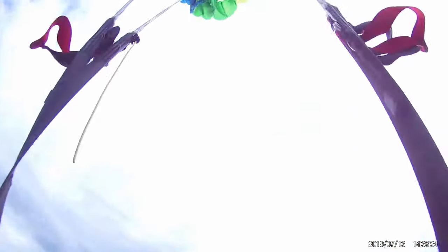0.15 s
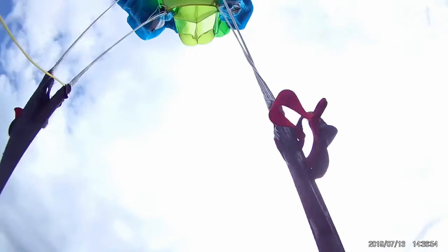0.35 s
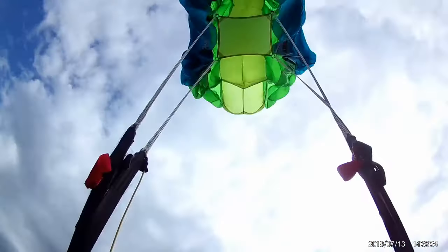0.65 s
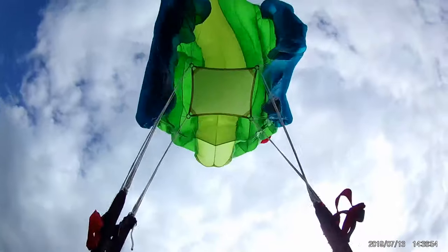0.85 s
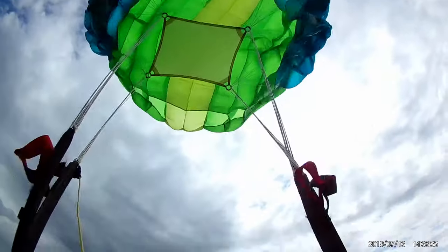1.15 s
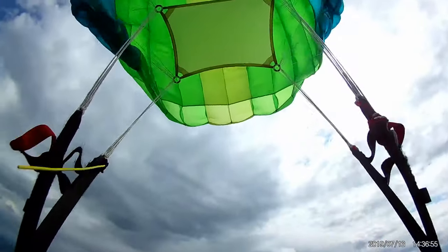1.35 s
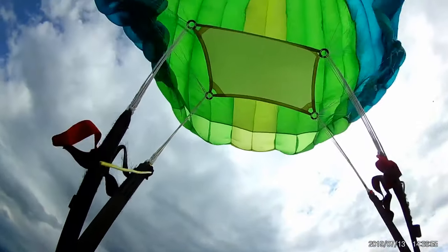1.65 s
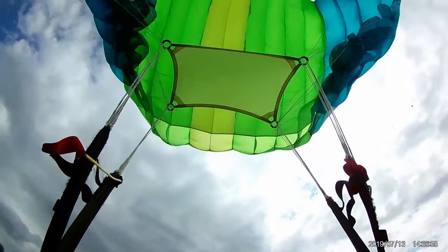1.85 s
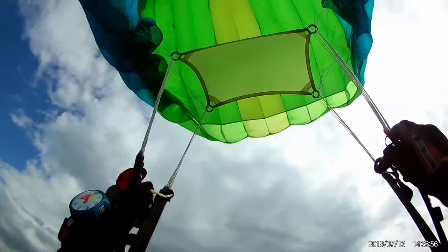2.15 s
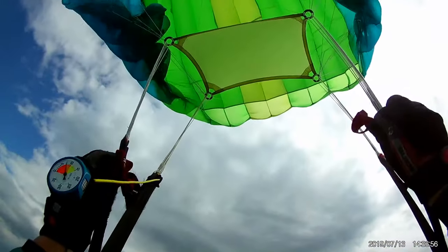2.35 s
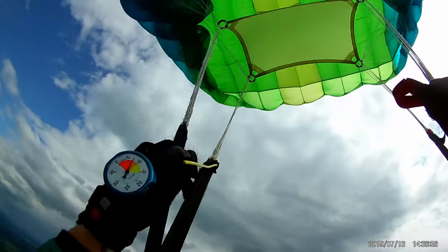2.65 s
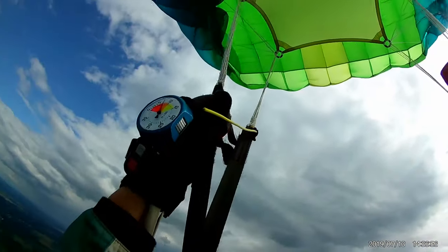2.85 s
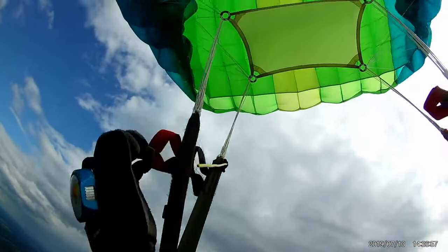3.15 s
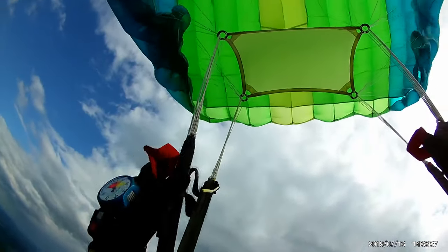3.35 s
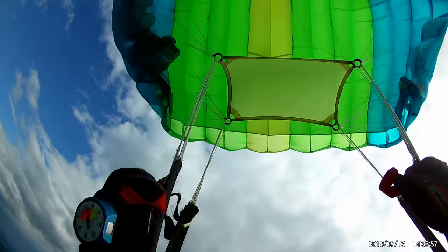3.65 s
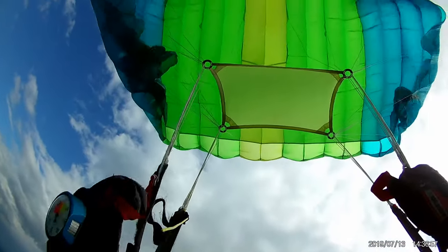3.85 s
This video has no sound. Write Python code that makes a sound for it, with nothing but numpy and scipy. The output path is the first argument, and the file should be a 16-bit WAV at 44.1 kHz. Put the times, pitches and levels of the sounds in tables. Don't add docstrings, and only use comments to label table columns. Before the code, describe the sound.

Wind roars at overload for a fraction of a second with cloth snaps and buckle ticks, then falls sharply as a parachute opens, leaving quiet low buffeting and hiss high in open air, on a helmet-mounted microphone.

```python
import sys
import numpy as np
from scipy import signal
from scipy.fft import rfft, irfft, next_fast_len
from scipy.io import wavfile
from scipy.ndimage import uniform_filter1d, map_coordinates

SR = 44100
rng = np.random.default_rng(int(sys.argv[2]) if len(sys.argv) > 2 else 0)


def digitize_waveform(pressure):
    field = np.atleast_2d(pressure).T
    bounded = np.clip(field, -1, 1)
    quanta = np.round(bounded * 32767).astype(np.int16)
    wavfile.write(sys.argv[1], SR, quanta)


def gain_from_db(level_db):
    decades = np.asarray(level_db, float) / 20
    return 10 ** decades


N = 176400

# time_s, air_db, buffet_db, roar_db
AIRSTREAM = [(0, -18, 6, 0.5), (.09, -21, 0.5, 5), (0.149, -22, 9.5, 4), (.24, -35, 18.5, 3),
             (0.361, -40, 22, 5.5), (0.601, -36, 14.5, 2), (.76, -40, 13.5, 3), (.95, -41.5, 12, 2.5),
             (1.15, -38.5, 9.5, -2.5), (1.251, -42, 1.5, -2.5), (1.3, -41.5, 9.5, 3), (1.6, -40.5, 11, 1.5),
             (2.05, -44, 10, 1), (2.25, -48.5, 12.5, 3), (2.48, -42.5, 6.5, -1), (2.75, -46, 8, 1.5),
             (3.05, -43, 5, 1), (3.95, -49.5, 14, 1.5)]
# frequency_hz, density_db
RUMBLE_SPECTRUM = [(12, -56), (20, -2.5), (38, -18.5), (56, -6), (75, -3), (140, -15), (220, -23.5),
                   (290, -41.5), (480, -120)]
# frequency_hz, density_db
SLACK_ROAR_SPECTRUM = [(76, -33.5), (130, -2.5), (260, -10.5), (365, -3), (415, -8.5), (781, -20),
                       (1000, -21), (1300, -50.5), (2200, -120)]
# frequency_hz, density_db
TAUT_ROAR_SPECTRUM = [(76, -27), (130, -2), (221, -4.5), (509, -1), (584, -10), (653, -4.5), (1000, -18.5),
                      (1300, -50.5), (2200, -120)]
# frequency_hz, density_db
HISS_SPECTRUM = [(700, -13.5), (1000, -9.5), (1600, -7.5), (2250, -15.5), (2650, -28), (4750, -32),
                 (7400, -34.5), (7900, -48)]
# centre_hz, width_hz, boost_db
HOUSING_CAVITIES = [(1278, 276, 9), (1920, 490, 7), (2160, 88, 1), (3045, 820, 16.5), (4000, 960, 11.5),
                    (5810, 1140, 9)]
# centre_hz, width_hz, level_db
LINE_TONES = [(648, 40, -8.5), (1439, 16, -13), (1894, 44, -16.5), (2122, 29, -18.5), (3620, 60, -33),
              (6000, 440, -31), (3085, 350, -24.5)]
# centre_hz, width_hz, slack_db, taut_db
WHISTLE_TONES = [(1304.4, 70, -0.5, -1), (1922, 45, -8.5, -6.5), (2300, 110, -9.5, -15)]
# time_s, level_db
PORT_EXPOSURE = [(0, -29), (.1, -29), (.24, -40), (.35, -43), (.65, -40), (.78, -47.5), (.9, -43),
                 (1.03, -51), (1.08, -42), (1.33, -42.5), (1.4, -52.5), (1.6, -49), (1.68, -57.5),
                 (1.9, -54.5), (4, -58.5)]
# peak_s, peak_db, length_s, dullness_db
CLOTH_SNAPS = [(.01, -6, 0.0072, 3.5), (0.047, -14, 0.011, 4.5), (0.088, -5.5, 0.0053, -1),
               (0.107, -13.5, 0.0094, 6), (0.117, -19, 0.0065, 1), (0.173, -18, 0.0028, 15.5),
               (.001, -17, 0.0023, 5), (0.144, -14, 0.013, 5.5), (0.206, -18, 0.015, 5.5),
               (0.27, -22, 0.01, 8), (0.324, -30.5, 0.013, 9), (0.349, -29, 0.0083, 6.5),
               (.38, -25, 0.01, 5), (.475, -30, 0.016, 13.5), (0.57, -43.5, 0.0085, 0),
               (0.632, -25, 0.012, 6.5), (0.693, -27, .012, 7.5), (1.112, -32, 0.0036, -1),
               (1.249, -46, 0.0027, -9), (1.277, -25.5, 0.0059, -11), (1.327, -33.5, 0.016, -2),
               (1.791, -35.5, 0.0046, -5), (1.806, -38, .006, -8), (1.863, -40, 0.015, -14)]
# frequency_hz, density_db
CRISP_SPECTRUM = [(120, -0.5), (300, -9.5), (700, -9), (1300, -3.5), (2200, -11.5), (2700, -19.5),
                  (4500, -26.5), (7800, -40.5)]
# frequency_hz, density_db
DULL_SPECTRUM = [(90, -13), (200, -0.5), (380, 1), (700, -9.5), (1100, -41)]
# peak_s, peak_db, pitch_hz, half_length_s
EDDY_STRIKES = [(.008, -4, 67, 0.018), (0.167, -6, 60.5, 0.012), (0.211, -12, 65, 0.016),
                (0.263, -12.5, 57.6, 0.012), (0.288, -17, 70, 0.021), (0.342, -14, 54.2, 0.017),
                (0.387, -6, 80, 0.0051), (0.423, -22, 85, 0.019), (0.487, -12.5, 110, 0.011),
                (0.532, -16.5, 64.4, 0.024), (0.601, -23, 60, 0.0077), (0.661, -12.5, 63.7, 0.028),
                (0.82, -24, 71, 0.026), (0.899, -16, 65.5, 0.023), (1.066, -23, 80, 0.013),
                (1.29, -17.5, 67, 0.013), (1.349, -20.5, 69, 0.0093), (1.461, -29, 70.6, 0.016),
                (1.521, -20.5, 71, 0.016), (1.601, -24, 66, 0.014), (1.692, -25.5, 69.6, 0.015),
                (1.765, -27, 57.6, 0.017), (1.958, -28.5, 79.4, 0.024), (2.045, -26.5, 67, 0.017),
                (2.312, -27, 67.3, 0.0055), (2.535, -27, 79, 0.016), (2.665, -28.5, 72.6, 0.032),
                (3.26, -32.5, 74.6, 0.026), (3.812, -30.5, 71.5, 0.021), (3.964, -24.5, 72.4, 0.023)]
# start_s, peak_db, pitch_hz, t60_s
BUCKLE_TICKS = [(.030, -8, 1500, 0.015), (0.052, -15, 1840, .03), (.069, -14, 1380, 0.027),
                (.083, -9, 1276, 0.067), (0.142, -19, 1294, .05), (.208, -17.5, 1316, 0.055),
                (0.256, -25.5, 1400, 0.053), (.483, -32, 1000, 0.043), (1.075, -45, 3830, .12),
                (1.117, -28.5, 1920, 0.045), (1.083, -38, 1290, .05), (1.24, -32, 2050, .04),
                (1.23, -42, 3020, .05), (1.164, -34, 1360, 0.062), (1.159, -39.5, 3020, .05),
                (1.248, -38, 4200, .02), (1.277, -39, 1260, 0.075), (1.334, -39, 3120, .04),
                (1.472, -40, 1740, .03), (.632, -30, 1756, .05), (.635, -27, 1190, .05),
                (1.523, -32, 1870, 0.035), (1.739, -44, 2930, .03), (1.788, -43, 1300, .05),
                (1.806, -38, 1400, .04), (1.861, -34, 1290, .04), (1.872, -38.5, 3000, .04),
                (2.059, -29.5, 1866, 0.024), (2.675, -37, 1340, .03), (3.135, -39, 1850, .03),
                (3.196, -40, 1990, .03), (3.396, -38, 1470, .03)]

TAUT_AT_S, TAUT_RISE_S = 1.3, 0.18
SHELTER_S, SHELTER_LASTS_S, SHELTER_DB = 1.731, 0.12, -7.5
WHISTLE_DRIFT = 0.015
HOWL_HZ, HOWL_WIDTH_HZ, HOWL_DB, HOWL_S, HOWL_LASTS_S = 364, 18, -18, 0.1, 0.045
CLIP_TOP, CLIP_HARD = 1.0, 12
HALF_RATE_HZ, EDGE_HZ = 8000, 350
MIRROR_DB, MIRROR_FALL_DB_PER_KHZ = 1, -9
LEAN_DB, LEAN_HZ = -19.5, 800
KEEP_UNDER_DB, KEEP_ABOVE_DB = -54, -99
LEAN_KEEP_UNDER_DB, LEAN_KEEP_ABOVE_DB = -15.5, -61
LEAN_FAVOUR_DB_PER_KHZ = 3
KEEP_SCATTER_DB, BAND_SCATTER_DB = 4.5, 3.5
SPARSE_DB = -8
FADE_S = 0.006


def unit(x):
    return x / np.sqrt(np.mean(x ** 2) + 1e-20)


def along(points, hz):
    f, v = np.transpose(points)
    return np.interp(np.log(hz + 1), np.log(f + 1), v, -120, -120)


def wobble(rate):
    return map_coordinates(rng.standard_normal(400), [np.arange(N) * min(rate, 90) / SR])


def filtered(x, response):
    m = next_fast_len(N + SR // 2)
    return irfft(rfft(x, m) * response(np.fft.rfftfreq(m, 1 / SR)), m)[..., :N]


def rush(response, patchy_db):
    z = signal.stft(rng.standard_normal(N), nperseg=512)[2]
    field = uniform_filter1d(rng.standard_normal(z.shape), size=6, axis=0)
    field = uniform_filter1d(field, size=8, axis=1)
    patched = signal.istft(z * gain_from_db(patchy_db * unit(field)), nperseg=512)[1][:N]
    return unit(filtered(patched, response))


def coloured(spectrum, patchy_db):
    return rush(lambda f: gain_from_db(along(spectrum, f)), patchy_db)


def bump(hz, centre_hz, width_hz):
    return 1 / np.sqrt(1 + (2 * (hz - centre_hz) / width_hz) ** 2)


def resonance(centre_hz, width_hz, patchy_db):
    return rush(lambda f: bump(f, centre_hz, width_hz) ** 2, patchy_db)


def tension(t):
    return 1 / (1 + np.exp((TAUT_AT_S - t) / TAUT_RISE_S))


def airstream():
    t = np.arange(N) / SR
    s, *columns = np.transpose(AIRSTREAM)
    air_db, buffet_db, roar_db = [np.interp(t, s, c) for c in columns]
    shelter_db = SHELTER_DB * np.exp(-((t - SHELTER_S) / SHELTER_LASTS_S) ** 4)
    gust_db = air_db + shelter_db + 0.45 * wobble(24.27) + 0.13 * wobble(56)

    def hollow(f):
        cavities_db = sum(db * bump(f, c, w) ** 2 for c, w, db in HOUSING_CAVITIES)
        return gain_from_db(along(HISS_SPECTRUM, f) + cavities_db)

    hiss = gain_from_db(-1.8 + 1.16 * wobble(38)) * rush(hollow, patchy_db=0.5)
    taut = tension(t)
    slack_roar = coloured(SLACK_ROAR_SPECTRUM, patchy_db=0.74)
    taut_roar = coloured(TAUT_ROAR_SPECTRUM, patchy_db=0.74)
    cloth = np.sqrt(1 - taut) * slack_roar + np.sqrt(taut) * taut_roar
    roar = gain_from_db(roar_db + 0.54 + 1.93 * wobble(28.02)) * cloth
    rumble = gain_from_db(buffet_db - 1.5 + 0.46 * wobble(8.1)) * coloured(RUMBLE_SPECTRUM, patchy_db=-1.1)
    lines = sum(gain_from_db(db + 0.82 * wobble(6.4)) * resonance(c, w, patchy_db=0.0)
                for c, w, db in LINE_TONES)
    return gain_from_db(gust_db) * (hiss + roar + rumble + taut * lines)


def whistles():
    t = np.arange(N) / SR
    taut = tension(t)
    drifting = np.arange(N) + np.cumsum(WHISTLE_DRIFT * wobble(9))
    tones = 0
    for centre_hz, width_hz, slack_db, taut_db in WHISTLE_TONES:
        level_db = slack_db + (taut_db - slack_db) * taut + 1.5 * wobble(12)
        steady = resonance(centre_hz, width_hz, patchy_db=-0.3)
        tones = tones + gain_from_db(level_db) * np.interp(drifting, np.arange(N), steady)
    return gain_from_db(np.interp(t, *np.transpose(PORT_EXPOSURE))) * tones


def canopy():
    t = np.arange(N) / SR
    crisp, dull = 0, 0
    for s, db, length, dull_db in CLOTH_SNAPS:
        crisp = crisp + gain_from_db(db - 5.5) * np.exp(-np.abs(t - s) / length)
        dull = dull + gain_from_db(db - 9 + dull_db) * np.exp(-((t - s) / length / 1.19) ** 2)
    cloth = gain_from_db(2.2 * wobble(80)) * coloured(CRISP_SPECTRUM, patchy_db=1.5)
    flap = coloured(DULL_SPECTRUM, patchy_db=2.5)
    howl_swell = gain_from_db(HOWL_DB) * np.exp(-((t - HOWL_S) / HOWL_LASTS_S) ** 2)
    howl = howl_swell * resonance(HOWL_HZ, HOWL_WIDTH_HZ, patchy_db=4)
    return crisp * cloth + dull * flap + howl


def eddies():
    t = np.arange(N) / SR
    thumps = np.zeros(N)
    for s, db, hz, half in EDDY_STRIKES:
        swing = np.sin(2 * np.pi * (hz * (t - s) + rng.random()))
        thumps += gain_from_db(db) * np.exp(-((t - s) / half) ** 2) * swing
    return thumps


def ticks():
    out = np.zeros(N + SR)
    t = np.arange(SR // 5) / SR
    for s, db, hz, t60 in BUCKLE_TICKS:
        contact = 0.25 * gain_from_db(-60 * t / 0.012) * rng.standard_normal(len(t))
        ring = np.sin(2 * np.pi * hz * t) + contact
        envelope = gain_from_db(db - 60 * t / t60) * (1 - np.exp(-t / 0.00052))
        out[round(s * SR):][:len(t)] += envelope * ring
    return out[:N]


def scene():
    port = airstream() + whistles() + canopy() + eddies() + ticks()
    return np.tile(port, (2, 1))


def dropped(x, under_db, above_db, favour_db):
    z = signal.stft(x, nperseg=2048, boundary="even")[2][:1024]
    power = (np.abs(z) ** 2).reshape(64, 16, -1)
    level_db = 10 * np.log10(power.sum(axis=1) + 1e-20)
    level_db = level_db + favour_db * np.arange(64)[:, None] * SR / 128000
    scatter = np.minimum(rng.standard_normal(level_db.shape[1]), 0.5)
    bar_db = np.maximum(level_db.max(axis=0) + under_db, above_db) + KEEP_SCATTER_DB * scatter
    over_db = level_db - bar_db + BAND_SCATTER_DB * rng.standard_normal(level_db.shape)
    share_db = 10 * np.log10(power / (power.sum(axis=1, keepdims=True) + 1e-20) + 1e-20)
    keep = (share_db + over_db[:, None] > SPARSE_DB).reshape(1024, -1)
    return signal.istft(np.pad(z * keep, ((0, 1), (0, 0))), nperseg=2048)[1][:N]


def low_rate(x):
    x = filtered(x, lambda f: np.clip((HALF_RATE_HZ - f) / EDGE_HZ - 0.3, 0, 1) ** 2)
    folded = 2 * x * np.cos(4 * np.pi * HALF_RATE_HZ * np.arange(N) / SR)

    def image(f):
        inside = (f > HALF_RATE_HZ) * (f < 1.7 * HALF_RATE_HZ)
        return inside * gain_from_db(MIRROR_DB + MIRROR_FALL_DB_PER_KHZ * (f - HALF_RATE_HZ) / 1000)

    return x + filtered(folded, image)


def roll_off(x):
    return signal.sosfilt(signal.butter(12, 15700, fs=SR, output="sos"), x)


def record(dry):
    x = dry[0] / (1 + np.abs(dry[0] / CLIP_TOP) ** CLIP_HARD) ** (1 / CLIP_HARD)
    x = low_rate(x)
    lean = gain_from_db(LEAN_DB) * filtered(x, lambda f: f ** 4 / (f ** 4 + LEAN_HZ ** 4))
    x = dropped(x, KEEP_UNDER_DB, KEEP_ABOVE_DB, 0)
    lean = dropped(lean, LEAN_KEEP_UNDER_DB, LEAN_KEEP_ABOVE_DB, LEAN_FAVOUR_DB_PER_KHZ)
    x = x * np.clip(np.arange(N, 0, -1) / (FADE_S * SR), 0, 1)
    mix = np.clip([x - lean, x + lean], -1, 1)
    return roll_off(mix)


dry = scene()
out = record(dry)
digitize_waveform(out)
```